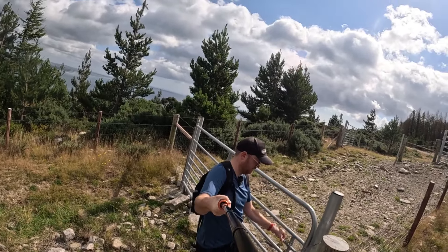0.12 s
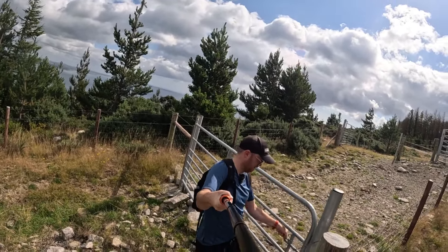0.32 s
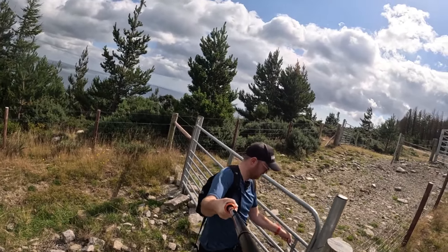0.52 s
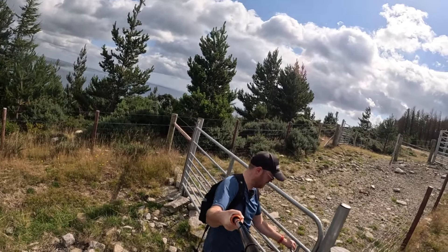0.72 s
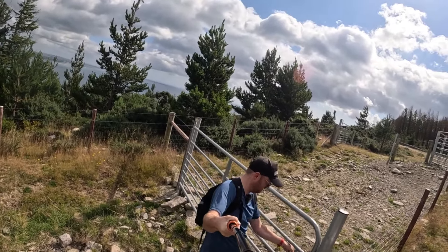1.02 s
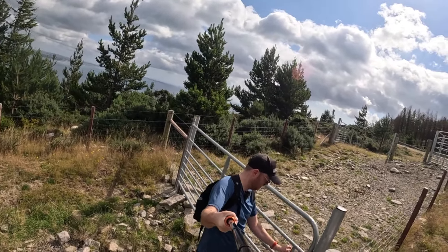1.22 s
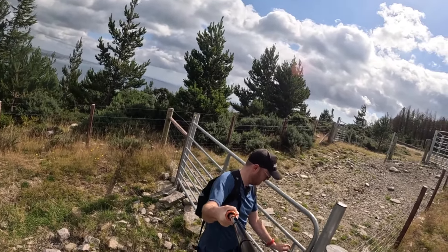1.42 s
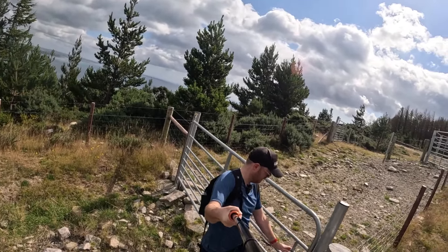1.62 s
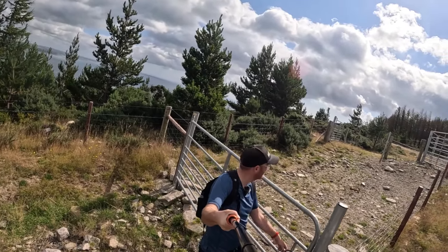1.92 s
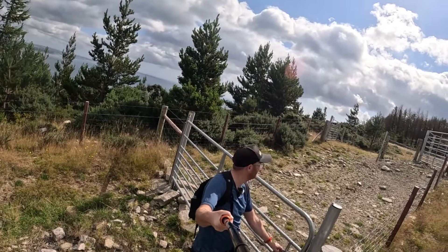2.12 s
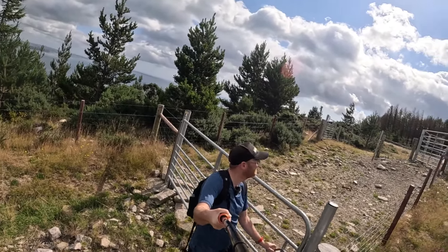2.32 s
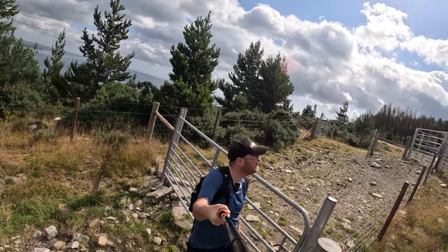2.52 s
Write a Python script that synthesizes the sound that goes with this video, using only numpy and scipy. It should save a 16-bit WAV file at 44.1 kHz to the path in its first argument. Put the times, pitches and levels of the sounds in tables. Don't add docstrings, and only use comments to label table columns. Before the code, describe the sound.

A tubular metal gate latch, close and outdoors. Faint ticks and small knocks begin around 0.1 s, growing into hard, irregular ringing clanks from 0.33 to 1.28 s, with a gritty bolt scrape beneath. Weaker knocks come at 1.4-1.65 s, then scraping fades and the steel rings on. A softer quick clatter falls at 2.15-2.36 s, with a faint tap near 2.6 s. Light low wind throughout.

```python
import sys
import numpy as np
from scipy import signal
from scipy.fft import rfft, irfft
from scipy.io import wavfile
from scipy.ndimage import uniform_filter1d

SR = 44100
rng = np.random.default_rng(int(sys.argv[2]) if len(sys.argv) > 2 else 0)


def decibels_to_gain(level_db):
    exponent = np.asarray(level_db, float) / 20
    return 10 ** exponent


def unload_wav(signal):
    wavfile.write(
        sys.argv[1],
        SR,
        np.round(np.clip(np.atleast_2d(signal).T, -1, 1) * 32767).astype(np.int16),
    )


N = 116865
LEAD = round(0.3 * SR)


def evened(x):
    return x / np.sqrt(np.mean(x ** 2) + 1e-20)


def lumpy(count, size):
    once = uniform_filter1d(rng.standard_normal(count), size=size)
    return evened(uniform_filter1d(once, size=size))


def read(points, hz):
    f, value = np.transpose(points)
    return np.interp(np.log(hz + 1), np.log(f + 1), value)


def coloured(x, points):
    gain = decibels_to_gain(read(points, np.fft.rfftfreq(x.shape[-1], 1 / SR)))
    return irfft(rfft(x) * gain, x.shape[-1])


# pitch_hz, density_db
WIND_COLOUR = [(15, -22.5), (40, 3), (90, -1.5), (200, -6), (600, -7), (2000, -59), (6000, -39),
               (16000, -44)]
# start_s, level_db
GUSTS = [(0, -74), (.35, -61), (0.951, -64.5), (1.098, -61), (1.45, -60.5), (1.75, -51), (1.93, -60),
         (2.051, -57), (2.421, -51.5), (2.548, -60.5), (2.65, -54)]


def wind():
    frames, hz = N // 256 + 5, np.fft.rfftfreq(1024, 1 / SR)
    real, imaginary, patches = rng.standard_normal((3, len(hz), frames))
    patches = evened(uniform_filter1d(uniform_filter1d(patches, 10, 0), 10, 1))
    gust_db = 3 * lumpy(frames, 6)
    rise_db = np.interp((np.arange(frames) * 256 - 256) / SR, *np.transpose(GUSTS)) + 55
    low = 1 / (1 + (hz[:, None] / 200) ** 2)
    level_db = read(WIND_COLOUR, hz)[:, None] + patches + low * (gust_db + rise_db)
    z = (real + 1j * imaginary) * decibels_to_gain(level_db)
    return decibels_to_gain(-46.5) * evened(signal.istft(z, nperseg=1024, noverlap=768)[1][:N])


def rings(modes, twin_depth=0.):
    hz, db, t60 = np.transpose(modes)[:, :, None].astype(np.float32)
    t = np.arange(66150, dtype=np.float32) / SR
    decay = np.exp(np.log(10) / 20 * (db - 60 * t / np.maximum(t60, .01)))
    out = decay * np.sin(2 * np.pi * hz * t)
    out[:, :2000] *= 1 - np.exp(-t[:2000] * hz / 0.6)
    if twin_depth:
        twin_hz = 27.86
        a, b, c, d = rng.random((4, len(hz), 1)).astype(np.float32)
        slow = np.cos(2 * np.pi * (twin_hz * (0.163 + 0.273 * a) * t + c))
        fast = np.cos(2 * np.pi * (twin_hz * (.5 + b) * t + d))
        out *= 1 + twin_depth * (slow + fast)
    return out


# pitch_hz, level_db, t60_s
LATCH = [(1174, -12.5, 0.84), (1520, -14.5, 0.54), (1665, -11.5, 0.89), (1744, -7, 0.4), (1959, -12, 0.79),
         (2287, -19, 0.54), (2460, -11, .5), (2704, -15.5, 0.8), (2794, -17, 1.22), (2855, -16.5, 0.84),
         (2980, -24.5, 0.52), (2990, -16, 0.89), (3210, -55, 0.32), (4005, -37.5, 1.5)]
# pitch_hz, level_db, t60_s
FRAME = [(410.5, -13.5, 1.54), (518, -12.5, 0.89), (595.5, -17, 0.64), (663, -16, 0.63), (810, -12, 1.22),
         (900, -14, 0.9), (929.6, -7, 0.87), (982, -16, 3), (1066, -10.5, 0.72), (1095, -18, 0.61),
         (1194, -11, 0.74), (1263, -1, 1.09), (1390, -9.5, 1.8), (1526, -7, 1.6)]


def tubes():
    return rings(LATCH, 0.71), rings(FRAME, 0.71)


# pitch_hz, level_db
BARS = [(71, -26), (120, -43), (184, -15.5), (337, -21), (507, -4.5), (763, -9.5), (944, -2), (2730, -3),
        (6000, -20.5), (7800, -37), (13200, -120)]
# pitch_hz, t60_s
BARS_T60 = [(150, 1), (600, 0.69), (1500, 1), (2200, 0.62), (3000, 0.66), (6000, 1)]


def bars(count=5):
    spot, hold = rng.random((2, 420))
    hz = 150 + 5200 * spot ** 1.4
    level_db = read(BARS, hz) - 14 * spot ** 8
    t60 = read(BARS_T60, hz) * (.5 + hold ** 2)
    ring = rings(np.transpose([hz, level_db, t60]))
    out = rng.standard_normal((count, len(hz))).astype(np.float32) @ ring
    return out / np.sqrt(np.mean(out[:, :2000] ** 2))


# start_s, level_db, grit_brightness_db
SCRAPE = [(0, -37.5, -17.5), (.09, -45, -21), (.2, -39, -9), (.3, -29, -1.5), (0.521, -31, -9.5),
          (0.651, -23.5, -20), (.8, -23, -11.5), (.95, -30, -26), (1.17, -26, -12.5), (1.44, -26, -15),
          (1.62, -25.5, -14.5), (1.68, -26, -15), (1.76, -29, -23), (1.95, -40, -25), (2.1, -40, -16),
          (2.28, -28, -16), (2.45, -32.5, -21), (2.65, -41.5, -15)]


def scrape(latch, frame, dense):
    s, db, grit_db = np.transpose(SCRAPE)
    now = np.arange(N) / SR
    size = decibels_to_gain(1.56 * np.minimum(rng.exponential(1, (2, N)), 3)) * rng.choice([-1, 1], (2, N))
    ticks = rng.random((2, N)) < 1500 / SR
    slips = size * ticks * decibels_to_gain(np.interp(now, s, db) - 19)
    damped = np.exp(-np.arange(8000) / SR / 0.04)
    steel = dense[0] + dense[1] + 0.17 * latch.sum(0) + 0.74 * frame.sum(0)
    dull = coloured(steel[:8000], [(300, 3), (1000, -1.5), (2000, -11), (5000, -24)])
    body = signal.oaconvolve(slips[0], dull * damped)[:N]
    grit = np.sqrt(abs(signal.oaconvolve(slips[1] ** 2, damped ** 19)[:N]))
    grit *= decibels_to_gain(np.interp(now, s, grit_db)) * decibels_to_gain(3 * lumpy(N, 1500))
    hiss = coloured(rng.standard_normal(N), SIZZLE)
    hiss = coloured(hiss, [(1500, -32), (3000, -2), (7000, -6), (14000, -5.5)])
    return body + 1.54 * grit * evened(hiss)


# start_s, pitch_hz, level_db, t60_s
ACCENTS = [(-.1, 520, -33, 0.65), (0.301, 188, -34.5, 0.64), (.328, 2028, -15, 0.31),
           (0.33, 1520, -21.5, 0.93), (0.327, 5750, -17, 0.044), (0.503, 1304, -24.5, 0.56),
           (0.629, 2410, -15, 0.11), (0.627, 1700, -24.5, 0.92), (.607, 188, -40, 1.1),
           (.875, 6900, -36, 0.14), (.982, 2636, -19, 0.25), (.996, 1707, -19, 0.4),
           (.996, 6790, -27.5, 0.55), (1.201, 2080, -11, 0.034), (1.201, 3670, -20, 0.053),
           (1.251, 2650, -35, 2.2), (1.249, 1302, -29, 2), (1.239, 930, -10, 0.34),
           (1.239, 952, -12.5, 0.32), (1.238, 1556, -12, 0.076), (1.239, 507, -21, 0.27),
           (1.238, 183, -27, 0.27), (1.239, 8300, -17, 0.028), (1.237, 6050, -18.5, 0.035),
           (1.251, 3776, -44.5, 2.1), (1.6, 518, -34, 0.58), (2.164, 976, -29, 0.72),
           (2.214, 3790, -44, 1.57), (2.256, 5216, -43, 0.72), (2.255, 1004, -26.5, 0.93),
           (1.239, 1060, -20, 0.13), (1.251, 470, -19.5, 0.14), (1.239, 690, -16, 0.076),
           (1.68, 880, -33, 0.6), (1.15, 1667, -23, 0.27), (1.198, 2064, -27.5, .6), (1.42, 2649, -38.5, 2),
           (1.45, 2613, -46, 1.8), (1.33, 995, -28, 1), (1.42, 1540, -41, 2.5), (1.62, 437, -35.5, 0.38),
           (1.66, 660, -36, 0.54), (1.75, 365, -44, 0.7), (2.09, 521, -36, 0.32), (2.12, 710, -41, 0.34),
           (1.244, 562, -18.5, 0.12), (.34, 935, -27, 0.53), (1.9, 1066, -44.5, 0.92)]


def accents():
    out = np.zeros(N + LEAD + 70000)
    for s, ring in zip(np.transpose(ACCENTS)[0], rings(np.array(ACCENTS)[:, 1:], 0.56)):
        at = LEAD + round(s * SR)
        out[at:at + len(ring)] += ring
    return out


# pitch_hz, level_db, t60_s
RAILS = [(2650, -15, 1.35), (2693, -16, 1.04), (1302, -14.5, 2.07), (2055, -11, 0.92), (3763, -24, 1.94),
         (3860, -28, 1.8), (1879, -26, 1.2)]


def rails():
    return rings(RAILS, 0.52).sum(0)


# pitch_hz, level_db, t60_s
BOLT = [(5185, -1, 0.47), (6930, -7, 0.29), (10000, -22, 0.13)]


def bolt():
    return rings(BOLT, 0.71)


# pitch_hz, level_db
SIZZLE = [(1760, -5.5), (3000, 2), (5740, -3.5), (6720, -1), (8560, -5.5), (14200, -21), (16000, -26),
          (16500, -58)]
# pitch_hz, t60_s
SIZZLE_T60 = [(3000, 0.39), (7000, 0.39), (12000, 0.25), (16000, 0.3)]


def sizzle(top_db, partials):
    noise = irfft(rfft(rng.standard_normal(SR)) * partials, SR)
    hz, t, z = signal.stft(coloured(noise, SIZZLE), SR, nperseg=128)
    bands_db = 2 * evened(uniform_filter1d(rng.standard_normal(len(hz)), size=2))
    tilt_db = bands_db + top_db * np.clip(np.log2(hz / 7000 + 1e-9), -.3, 1)
    decay_db = 60 * t / read(SIZZLE_T60, hz)[:, None]
    out = signal.istft(z * decibels_to_gain(tilt_db[:, None] - decay_db), SR, nperseg=128)[1]
    now = np.arange(len(out)) / SR
    chatter = evened(uniform_filter1d(rng.exponential(1, len(out)) - 1, size=60))
    out = out * decibels_to_gain(3.5 * np.exp(-now / .02) + 1.5 * chatter * np.exp(-now / .08))
    return out / np.sqrt(np.mean(out[:600] ** 2))


def place(count):
    return decibels_to_gain(2.5 * rng.standard_normal(count)) * rng.choice([-1, 1], count)


# start_s, force_db, brightness_db, top_treble_db
FAINT_KNOCK = (0.5, -33, -25, -5)
# start_s, force_db, brightness_db, top_treble_db
KNOCKS = [(0.082, -50.5, -4.5, 13), (0.097, -44.5, -7, 9), (0.11, -30.5, -17, 12), (0.142, -18.5, -18, -3),
          (0.222, -17.5, -19, -16), (0.327, -7.5, -11.5, 0), (0.329, -6.5, -15, 2), (0.437, -7, -12, -3.5),
          (0.607, -6.5, -16, -3.5), (0.628, -9.5, -11.5, 12.5), (0.68, -7, -20, -3), (0.874, -20, -12, 0.5),
          (0.982, -7, -12.5, 11.5), (0.996, -7, -8.5, 3), (1.056, -6, -17, 16), (1.151, -4, -17.5, -3.5),
          (1.199, -10.5, -10, -20), (1.239, -11.5, -9.5, -6), (1.251, -12, -25, 3), (1.279, -13, -44, 4),
          (1.42, -15, -23, -18), (1.475, -16.5, -19.5, -15), (1.62, -28, -26, -10), (1.66, -37.5, -5.5, 4),
          (2.123, -48, -6.5, 9), (2.158, -13.5, -26, -11), (2.213, -10.5, -14, -18),
          (2.235, -18.5, -10.5, -11), (2.256, -13, -15, -9), (2.272, -20.5, -12.5, -14),
          (2.308, -21, -19, -28), (2.355, -22.5, -32, -31), (2.611, -36, -18, 2)]


def knocks(latch, frame, dense):
    out = np.zeros(N + LEAD + 70000)
    rail_ring, bolt_ring = rails(), bolt()
    t = np.arange(1500) / SR
    partials = decibels_to_gain(3.5 * lumpy(SR // 2 + 1, 20))
    for k, (s, force_db, bright_db, top_db) in enumerate([FAINT_KNOCK] + list(KNOCKS)):
        low = 0.78 * place(len(latch)) @ latch + 0.22 * place(len(frame)) @ frame
        low += 0.72 * place(1) * rail_ring
        body = decibels_to_gain(-10.5) * low + decibels_to_gain(-14) * dense[k % len(dense)]
        crack = coloured(rng.standard_normal(len(t)), BARS) * 3 * np.exp(-t / 0.0033)
        body[:len(t)] += decibels_to_gain(-34) * crack
        high = decibels_to_gain(-17.5) * place(len(bolt_ring)) @ bolt_ring
        high[:SR] += decibels_to_gain(-2.5) * sizzle(top_db, partials)[:SR]
        at = LEAD + round(s * SR)
        out[at:at + len(body)] += decibels_to_gain(force_db) * (body + decibels_to_gain(bright_db) * high)
    return out


def gate():
    latch, frame = tubes()
    dense = bars()
    struck = knocks(latch, frame, dense) + accents()
    low_cut = signal.butter(4, 155, "high", fs=SR, output="sos")
    struck = signal.sosfilt(low_cut, struck)[LEAD:LEAD + N]
    return struck + scrape(latch, frame, dense)


# pitch_hz, level_db
SIDE_DB = [(30, -34), (150, -27.5), (500, -39.5), (1500, -48), (4000, -31), (14000, -20)]


def scene():
    mid = wind() + gate()
    hz, t, z = signal.stft(mid, SR, nperseg=512)
    turned = z * np.exp(2j * np.pi * rng.random(z.shape)) * decibels_to_gain(read(SIDE_DB, hz))[:, None]
    patches = uniform_filter1d(rng.standard_normal(z.shape), size=40, axis=0)
    patches = evened(uniform_filter1d(patches, size=3, axis=1))
    side = signal.istft(turned * decibels_to_gain(6 * patches), SR, nperseg=512)[1][:N]
    return np.array([mid + side, mid - side])


def band_limit(x):
    return signal.sosfilt(signal.butter(12, 16830, fs=SR, output="sos"), x)


def record(dry):
    limited = 1.246 * np.tanh(dry / 1.341)
    mix = coloured(limited, [(15500, 0), (15900, -46)])
    return band_limit(mix)


dry = scene()
out = record(dry)
unload_wav(out)
```